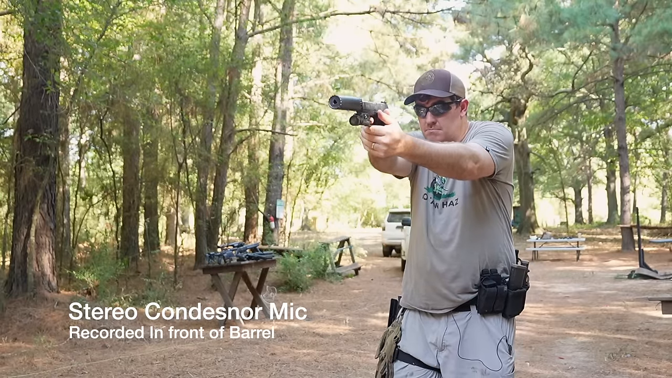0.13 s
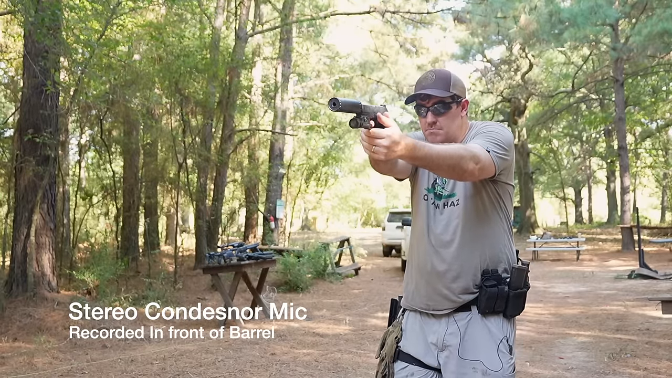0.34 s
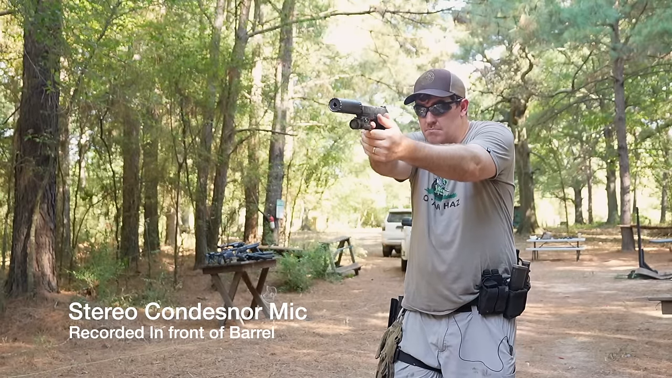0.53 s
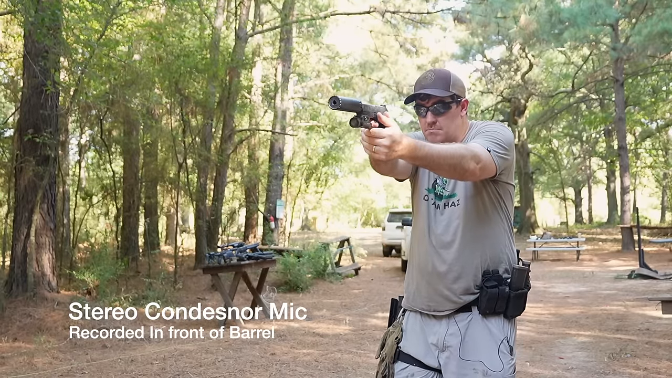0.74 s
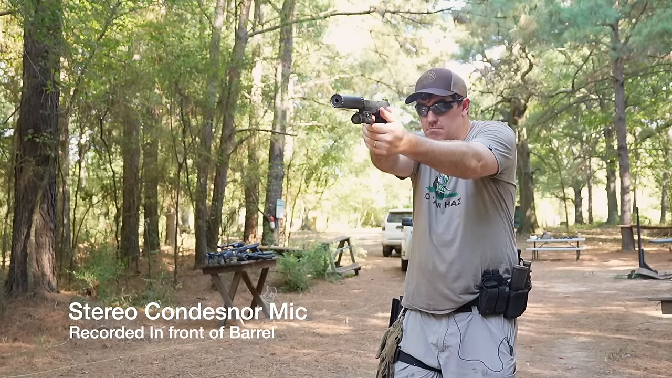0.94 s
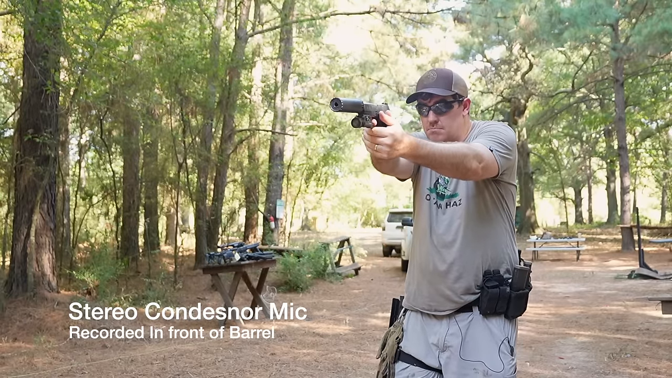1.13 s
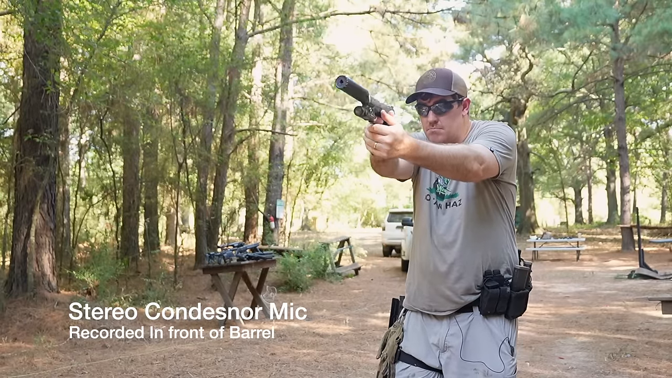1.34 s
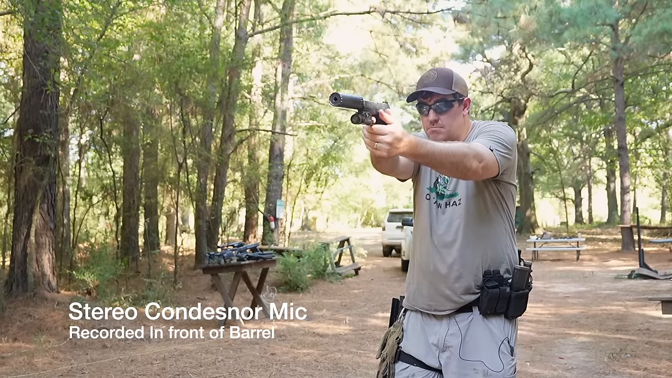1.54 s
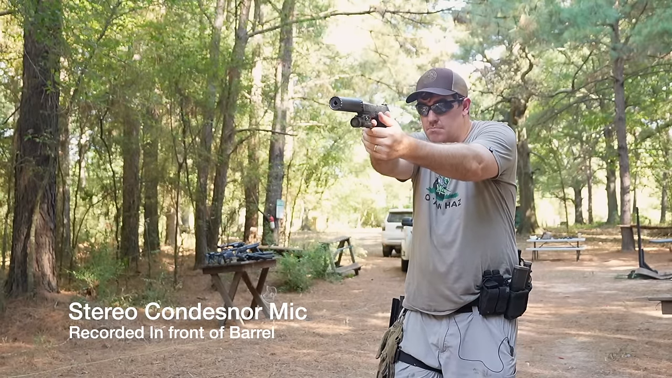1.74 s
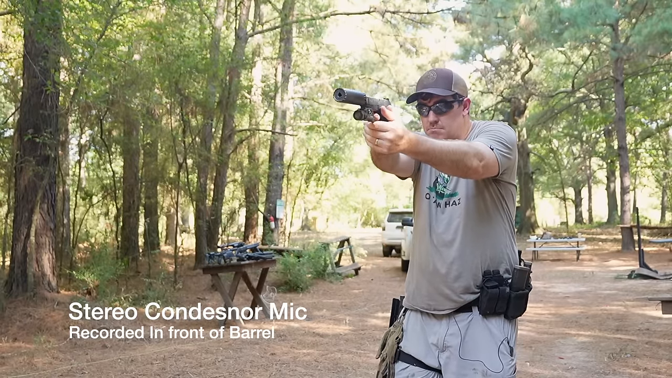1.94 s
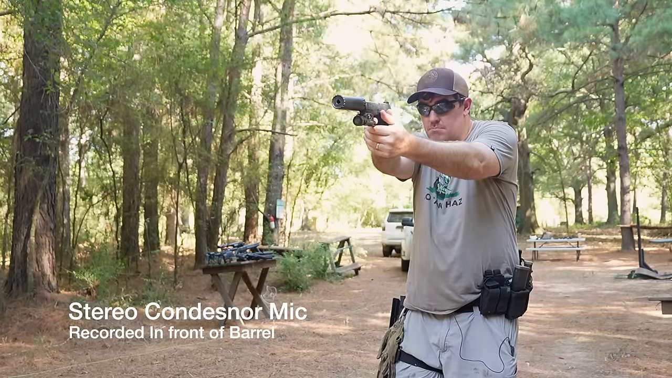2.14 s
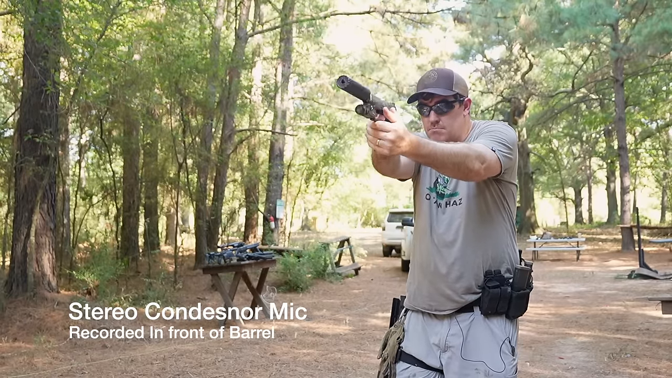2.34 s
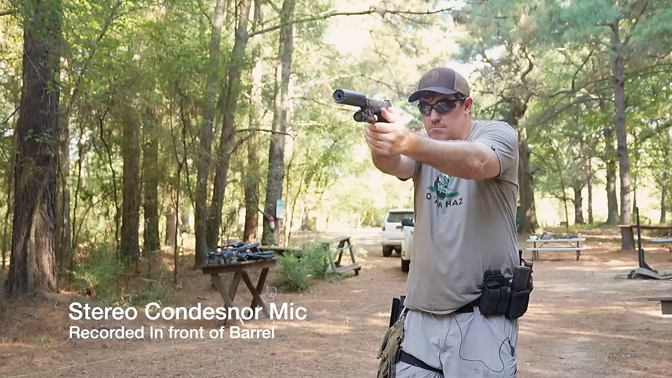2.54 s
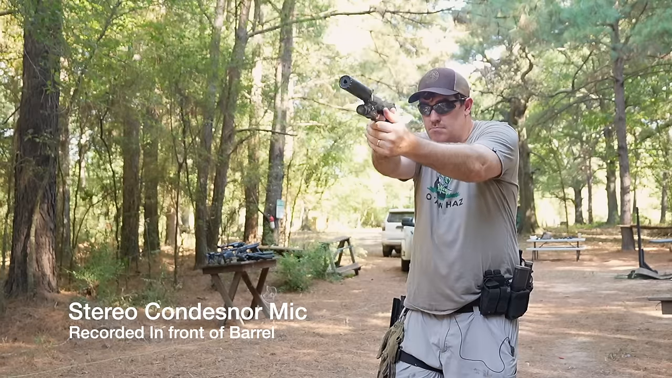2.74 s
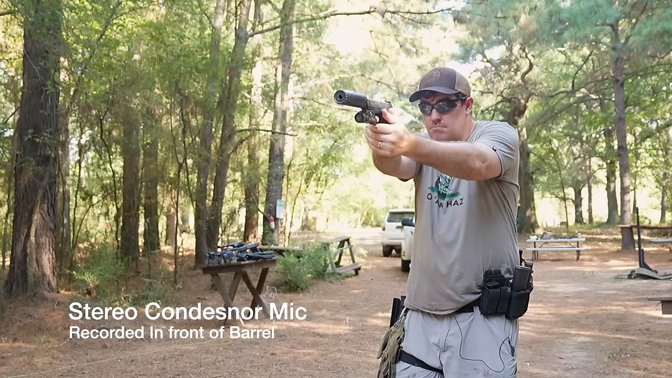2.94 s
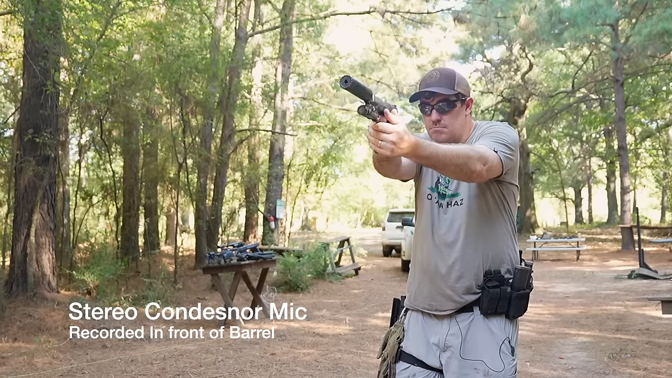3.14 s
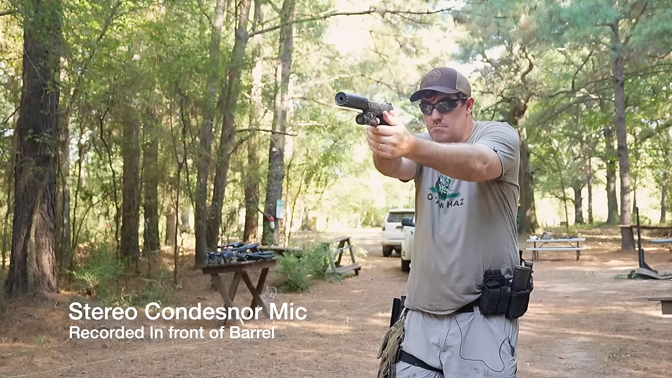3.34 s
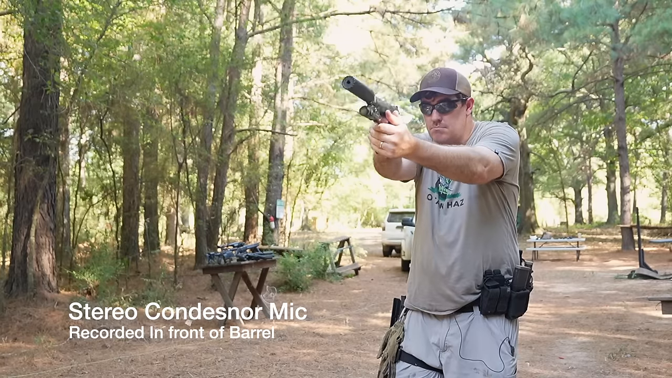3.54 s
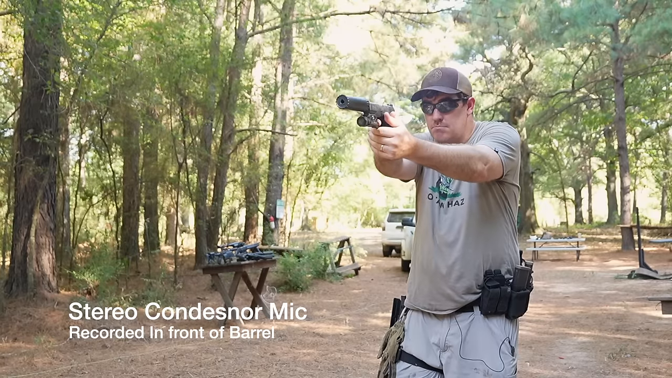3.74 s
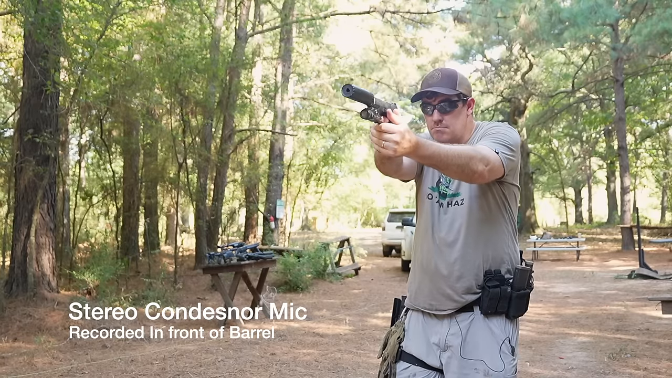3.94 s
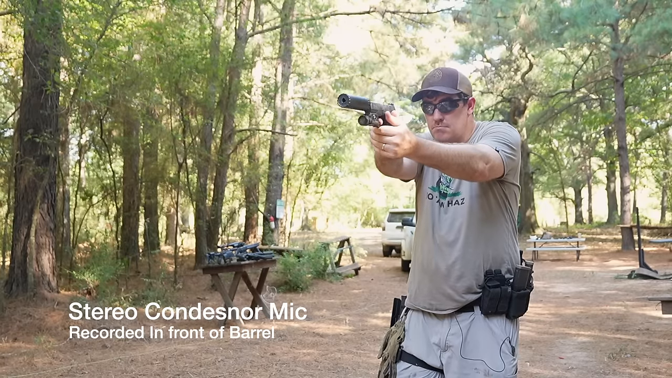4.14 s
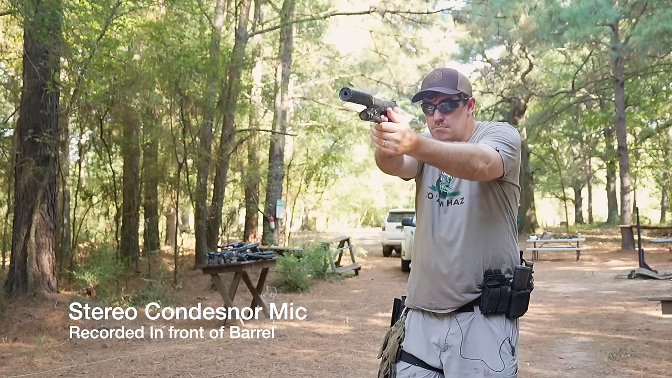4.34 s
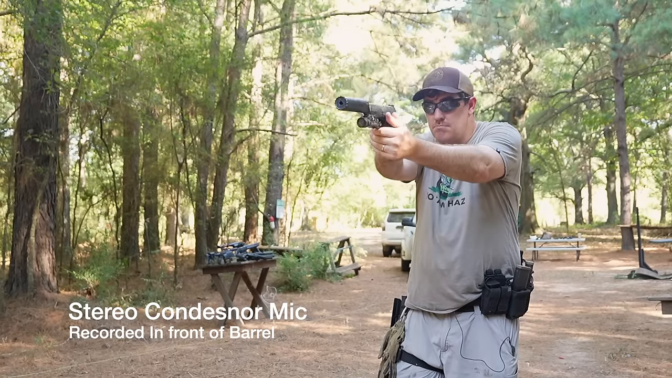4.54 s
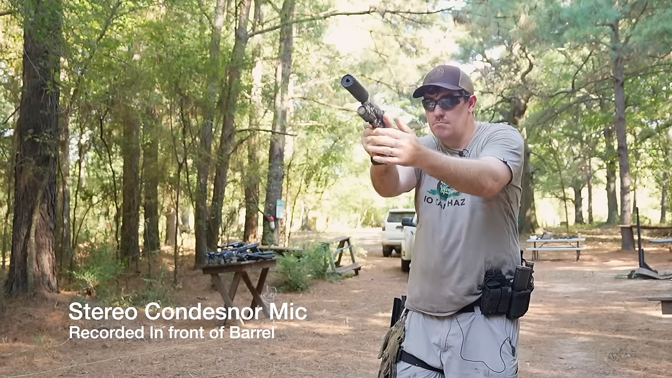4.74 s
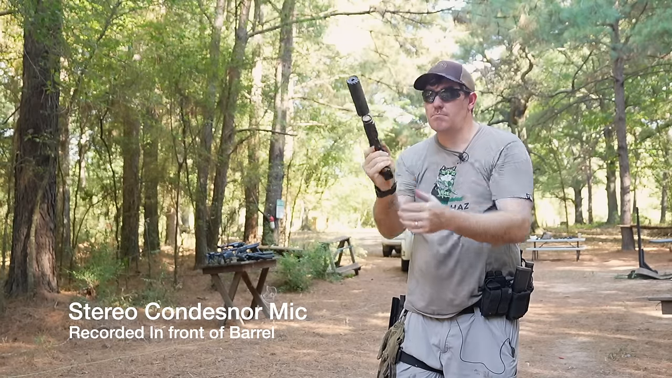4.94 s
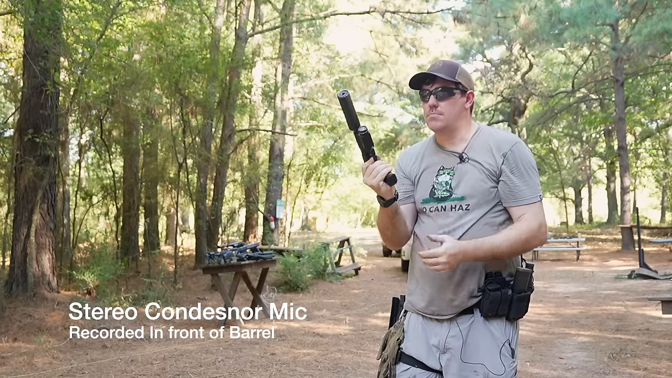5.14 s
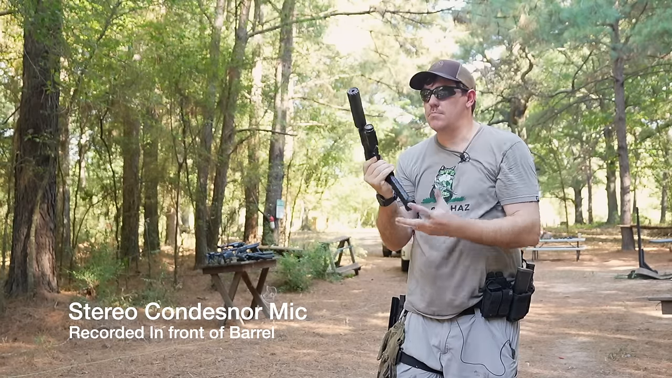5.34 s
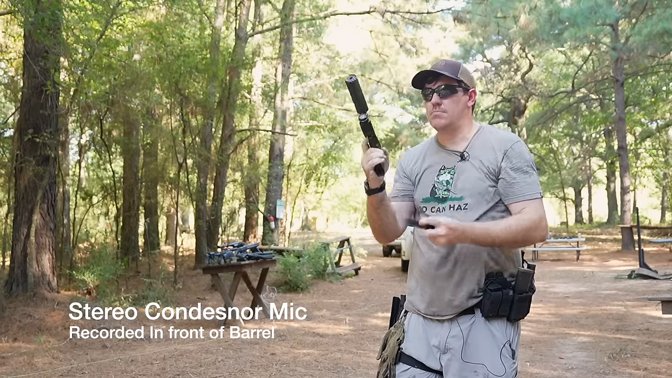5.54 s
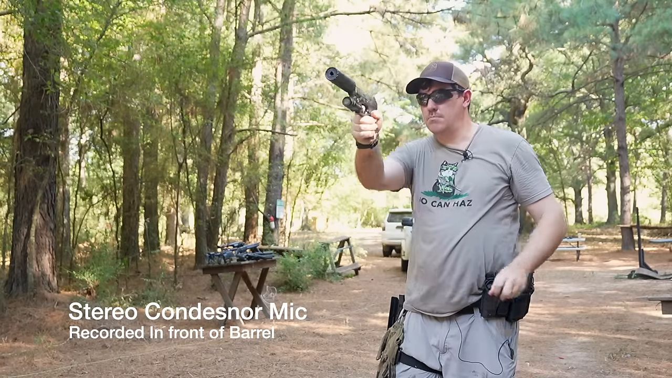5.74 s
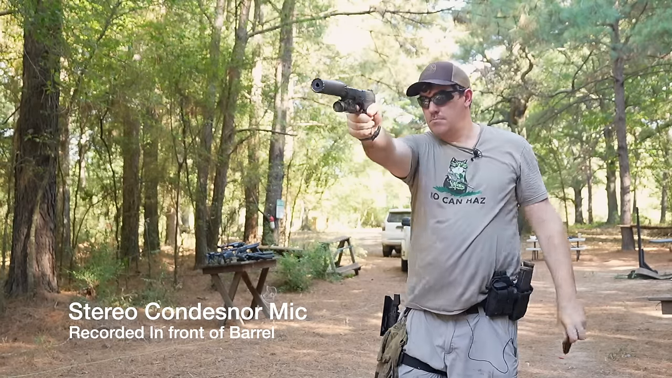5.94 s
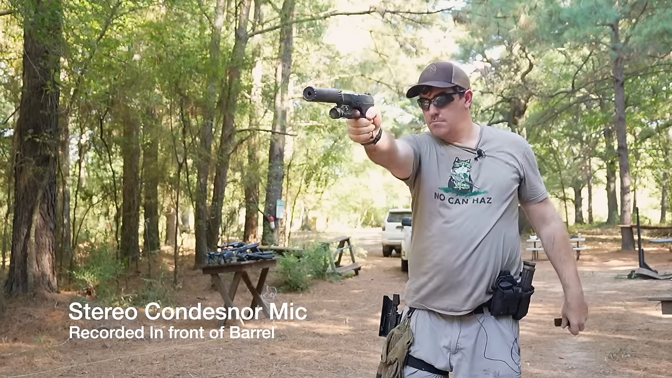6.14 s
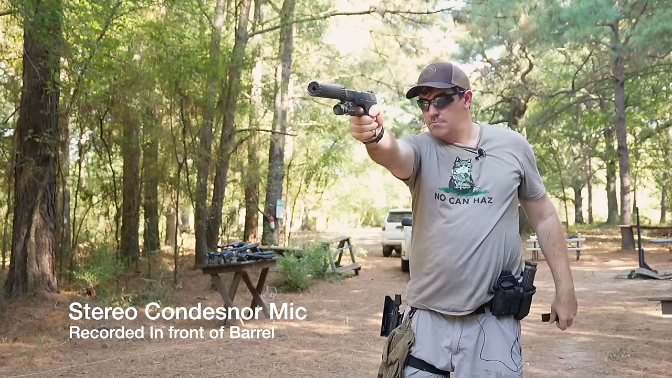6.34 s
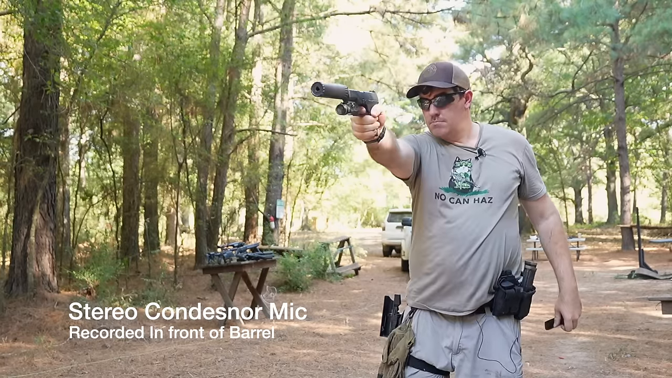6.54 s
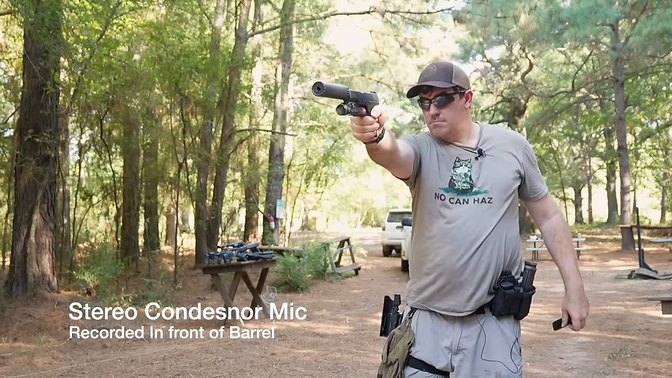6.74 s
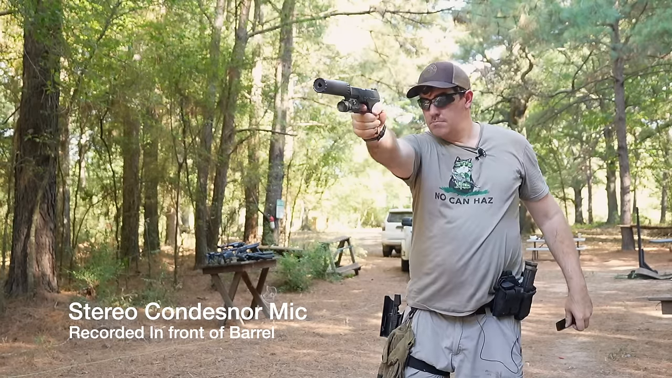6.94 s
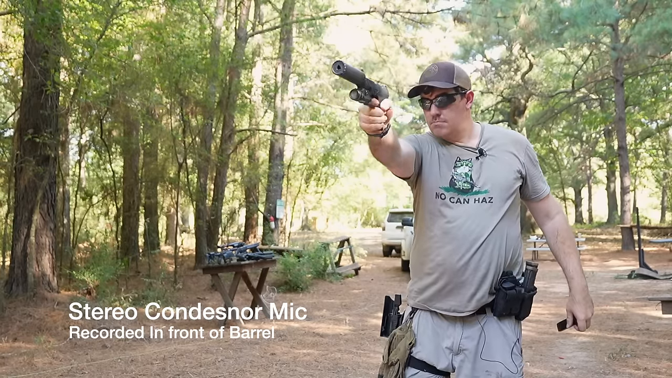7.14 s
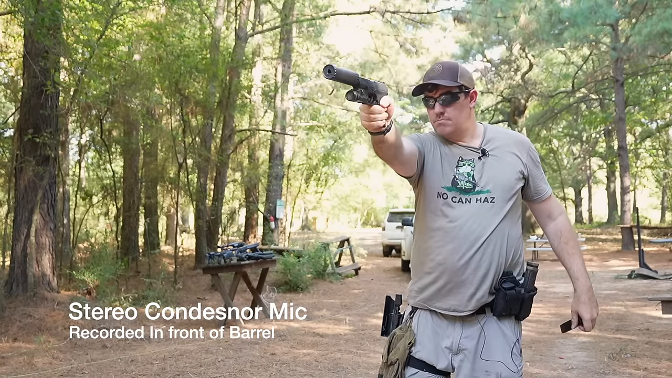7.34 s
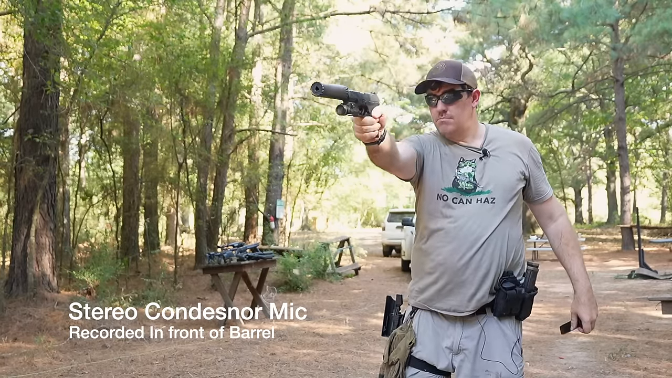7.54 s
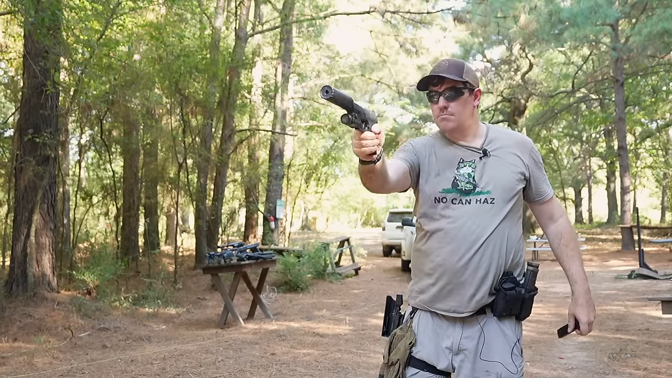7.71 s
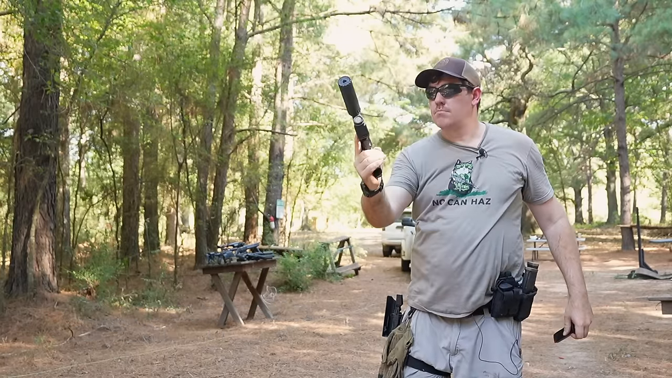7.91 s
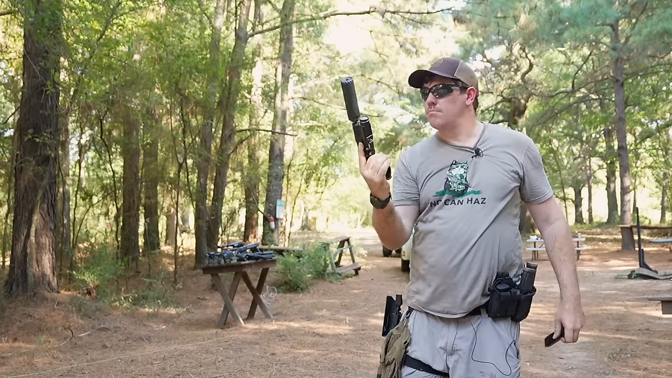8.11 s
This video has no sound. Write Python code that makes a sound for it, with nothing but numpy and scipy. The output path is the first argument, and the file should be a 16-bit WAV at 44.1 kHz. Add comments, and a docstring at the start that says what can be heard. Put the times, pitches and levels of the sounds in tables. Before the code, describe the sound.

A suppressed pistol fires ten quickening shots in the woods, a magazine clicks out, and one last shot follows after a pause.

```python
"""A suppressed pistol fires ten shots in a pine wood, is unloaded, and fires the round left in the chamber.
Each shot layers a hiss of gas from the can, a low puff on the microphone in front of the muzzle and
the steel clack of the slide. Trunks throw back slaps and a grainy tail with a thin whine in it;
spent cases hop on the ground. Behind sit distant shots, one dull thud, a bird, light wind and a low hum."""
import sys
import numpy as np
from scipy import signal
from scipy.fft import rfft, irfft, next_fast_len
from scipy.io import wavfile

SR = 44100
rng = np.random.default_rng(int(sys.argv[2]) if len(sys.argv) > 2 else 0)


def to_wav(s):
    """Save 16-bit WAV."""
    ch = np.atleast_2d(s).T  # columns
    pcm = np.round(np.clip(ch, -1, 1) * 32767)  # PCM
    wavfile.write(sys.argv[1], SR, pcm.astype(np.int16))


N = 360441
TIME = np.arange(N) / SR
AGE = TIME[:SR // 2]   # clock for one short hit

# the pistol's cues, with relative layer levels:
# (time [s], blast [dB], puff [dB], pressure push [signed gain], slide closing [dB], whine [dB])
SHOTS = [(0.024, -1, -12.5, -0.17, 0.5, -41.5), (0.7921, 0.5, -21, -0.12, 3, -33),
         (1.34, 0, -10.5, 0.082, -2, -39.5), (1.8597, -1.5, -16.5, 0.064, .5, -45),
         (2.3222, 0.1, -15, 0.093, 1.5, -38), (2.7253, -1, -4.5, 0.046, -2, -43.5),
         (3.1278, 2, -6.5, 0.025, 0.5, -46), (3.5241, 0, -6, -0.2, 0.5, -43.5),
         (3.9022, -1, -11, -0.15, 4.5, -36.5), (4.2725, -1.2, -8, 0.14, 4.5, -36.5),
         (7.1126, -1, -8, 0.12, -5, -38.5)]
# knocks of the action around ignition: (time from the shot [s], level [dB], t60 [s])
ACTION_KNOCKS = [(-.0098, -27, 0.016), (-.0022, -19.5, 0.04), (0.014, -4.5, 0.026), (0.0191, -8.5, 0.022),
                 (0.032, -15.5, 0.021)]
# tone of the gas, the frame, the slide and small metal parts: (frequency [Hz], level [dB])
BLAST_EQ = [(150, -4.5), (300, -3.5), (500, -6.5), (1300, -10.5), (2500, -3.5), (4000, -4), (5300, 0.5),
            (6100, -1.5), (7200, 4), (10500, 0), (12000, -2.5), (16000, 2)]
FRAME_EQ = [(200, -12), (600, -9), (1200, -12.5), (2400, -1.5), (4000, -5), (8000, -6), (10600, -3.5),
            (12000, -7), (16000, -20.5)]
SLIDE_EQ = [(200, -23), (900, -14.5), (2000, -18.5), (4200, -14), (6000, -10.5), (7700, 0), (9000, -2.5),
            (10900, 6.5), (11600, -12), (13000, -10), (16000, -8.5)]
CLICK_EQ = [(300, -38), (780, -16), (1200, -21.5), (2400, -15), (3300, -16.5), (4000, -6), (5000, -0.5),
            (6300, 3.5), (7600, 3), (9300, -4.5), (11000, 1), (13000, -8.5), (16000, -7)]
# the slide's steel: (frequency [Hz], relative level at the rear stop [dB], on closing [dB], t60 [s])
SLIDE_MODES = [(7470, -25.5, -35.5, .035), (8170, -25.5, -36.5, .035), (9100, -31, -35.5, 0.04),
               (10055, -28, -29, .025), (10680, -34, -17.5, 0.042), (10400, -20, -33, 0.02),
               (15630, -33.5, -36, .04)]
# clicks of the trigger, the magazine and the grip: (time [s], level [dB], t60 [s])
HANDLING_CLICKS = [(0.5104, -40.5, 0.018), (1.172, -35, .013), (4.9677, -45, .029), (4.995, -47, .025),
                   (5.234, -12, 0.016), (5.435, -52.5, 0.032), (5.5422, -51.5, .025), (5.6897, -51, 0.018)]
# small parts ringing on after a click: (time [s], frequency [Hz], level [dB], t60 [s])
PART_PINGS = [(4.9675, 3650, -44, .025), (4.9675, 9740, -53, .18), (5.2338, 790, -41.5, 0.03),
              (5.2342, 5580, -49, 0.13)]
# scatter from the trees: (frequency [Hz], near trunks [dB], deep wood [dB], deep wood t60 [s])
WOOD_BANDS = [(150, -35.5, -31.5, 1.3), (357.2, -40.5, -38, 2.3), (684, -23.5, -36, 3.72),
              (1180, -21.5, -39, 3.8), (2500, -16.5, -28.5, 1.59), (3993, -18, -28, 1.4),
              (5292, -13, -31.5, 1.3), (6200, -14, -29.5, 1.54), (7860, -11, -29, 1.295),
              (10450, -16, -34.5, 1.1), (15500, -27, -43.5, .9)]
# big trunks that slap back every shot: (delay [s], relative level [dB])
BIG_TRUNKS = [(.045, -24), (0.1137, -23), (.1305, -27), (.1505, -42), (.1945, -38), (0.2312, -32)]
# shots elsewhere on the range: (time [s], crack [dB], wash [dB], treble edge [Hz], ring [dB])
FAR_SHOTS = [(.511, -22, -28.5, 2995, -58), (1.17, -26, -30, 1800, -66), (4.998, -38, -41, 6000, -72),
             (5.48, -35, -46, 2280, -79), (7.657, -24.5, -35, 8900, -55.5)]
# their colour through the trees: (frequency [Hz], relative level [dB], t60 [s])
FAR_WOOD_BANDS = [(300, -26, 1.5), (700, -10, 1.9), (1000, -6, 2.1), (1400, -1.5, 2.1), (1800, -3.5, 2.4),
                  (2800, -4.5, 2), (6500, -4.5, .8), (12130, -24.5, .5)]
# narrow rings in their wash, as of a far steel plate: (frequency [Hz], relative level [dB])
FAR_RINGS = [(924, -0.5), (1350, -1.5), (1750, -3), (2080, -6)]
# wind on the microphone: (time [s], half length [s], level [dB])
GUSTS = [(.44, 0.099, -37), (2.07, 0.11, -46), (2.954, 0.13, -49.5), (5.778, 0.029, -50),
         (6.251, 0.17, -50)]
# the bed of still air: (frequency [Hz], level [dB])
AIR_EQ = [(20, -27.5), (50, -48), (130, -46.5), (280, -59), (600, -57.5), (1200, -65), (2200, -71.5),
          (3200, -71), (5000, -76.5), (16000, -77.5)]


def pistol(ground_echo_s=.0204, jitter_s=.0004, slide_travel_s=.0385, fouling_s_per_shot=.00017):
    """Gas, crack and ground bounce over the knocking action; the slide runs later as the gun fouls."""
    out = np.zeros(N)
    for k, (s, blast_db, puff_db, push, closing_db, _) in enumerate(SHOTS):
        add(out, s, gas_blast(blast_db) + puff(puff_db))
        add(out, s, from_db(4) * pressure_push(push))
        add(out, s, snap(db=-.5, hz=1800))   # the shock front that leads the gas
        add(out, s + ground_echo_s, snap(db=-7, hz=2400))
        for after_s, db, t60 in ACTION_KNOCKS:
            add(out, s + after_s + rng.normal(0, jitter_s), knock(FRAME_EQ, db + rng.normal(0, 1), t60))
        slide(out, s + slide_travel_s + k * fouling_s_per_shot, closing_db)
    return out


def gas_blast(db, blowdown_s=.01):
    """The hiss: gas surges from the can at once, then dwindles as its chambers empty."""
    flow = from_db(-3.5) * np.exp(-(AGE / blowdown_s) ** 3)
    surge = from_db(-3.5) * decay(AGE, t60=.024)
    leak = from_db(-24) * decay(AGE, t60=.08)
    return from_db(db) * (flow + surge + leak) * noise(BLAST_EQ, len(AGE))


def puff(db, hz=86, peak_s=.0048, flutter_ratio=2.4):
    """The low punch: the gas cloud rocks the microphone, with a faster flutter and eddies on top."""
    rock = np.sin(2 * np.pi * hz * AGE)
    flutter = from_db(-14) * np.sin(2 * np.pi * flutter_ratio * hz * AGE)
    eddies = from_db(-20) * band_noise(170, 450, len(AGE))
    swell = (AGE / peak_s) ** 2 * np.exp(2 - 2 * AGE / peak_s)
    return from_db(db) * swell * (rock - flutter + eddies)


def pressure_push(push, rise_s=.012):
    """The sub layer: the microphone holds the push briefly, swings past rest and creeps back."""
    age = TIME[:2 * SR]
    hold_s, recover_s = (.088, .3) if push > 0 else (.036, .15)   # suction lets go sooner
    held = np.exp(-np.minimum((age / hold_s) ** 3, 50)) * (1 - np.exp(-age / rise_s))
    back = age * np.exp(-2 * age / recover_s)
    return push * (held - back * held.sum() / back.sum())   # the two lobes cancel


def snap(db, hz):
    """The crack: one N-shaped pressure pulse with its energy centred on hz."""
    phase = 2 * np.pi * hz * AGE[:256] - np.pi
    return -from_db(db) * phase * np.exp((1 - phase ** 2) / 2)


def slide(track, stop_s, closing_db, rebound_s=.0048, return_s=.0143):
    """Mix in the clack: the slide hits its rear stop, rebounds and slams shut."""
    add(track, stop_s, knock(SLIDE_EQ, db=1, t60=.013))
    add(track, stop_s, steel_ring(db=1.5, closing=False))
    add(track, stop_s + rebound_s, knock(SLIDE_EQ, db=-10.5, t60=.011))
    add(track, stop_s + return_s, knock(SLIDE_EQ, db=closing_db - 11, t60=.042))
    add(track, stop_s + return_s, steel_ring(db=closing_db - .5, closing=True))


def steel_ring(db, closing, spread_db=2, detune=.002):
    """The slide's bright modes, struck a little differently each time."""
    age, out = AGE[:SR // 8], 0
    for hz, stop_db, close_db, t60 in SLIDE_MODES:
        strength = from_db(db + (close_db if closing else stop_db) + rng.normal(0, spread_db))
        pitch = hz * (1 + rng.normal(0, detune))
        out = out + strength * np.sin(2 * np.pi * pitch * age) * decay(age, t60)
    return out


def knock(eq, db, t60):
    """A hard contact: a burst of dense, quickly dying vibration."""
    return from_db(db) * noise(eq, 4096) * decay(AGE[:4096], t60)


def wood_tail(send_db=-.42, near_t60=.45, rise_s=.047, grain_db=2, hop=32):
    """Near trunks return a bright, grainy wash; the deep wood rings longer and duller."""
    fired, out = np.zeros(N), np.zeros(N)
    for s, *_ in SHOTS:
        fired[round(s * SR)] = from_db(send_db) ** 2
    coarse = TIME[::hop]   # the envelopes run on a slower clock
    fired = np.add.reduceat(fired, np.arange(0, N, hop))
    build_up = 1 - np.exp(-(coarse / rise_s) ** 2)
    grain_times = TIME[::40]
    grain = from_db(grain_db * np.interp(TIME, grain_times, rng.standard_normal(len(grain_times))))
    n = next_fast_len(N)
    grainy = rfft(rng.standard_normal(N) * grain / np.sqrt(np.mean(grain ** 2)), n)
    bins = np.arange(n // 2 + 1) * SR / n
    for k, (_, near_db, deep_db, deep_t60) in enumerate(WOOD_BANDS):
        near = from_db(near_db) * decay(coarse, near_t60)
        deep = from_db(deep_db) * decay(coarse, deep_t60)
        one_tail = (near ** 2 + deep ** 2) * build_up ** 2
        power = np.abs(signal.fftconvolve(fired, one_tail)[:len(coarse)])
        band = irfft(grainy * band_share(WOOD_BANDS, k, bins), n)[:N]
        out += band * np.interp(TIME, coarse, np.sqrt(power))
    return out


def trunk_slaps(count=44, centre_hz=2900, spread_db=4, small_db=-20):
    """Trunks return each crack at fixed delays: a few big ones clearly, small ones fading with distance."""
    out, lags = np.zeros(N), rng.uniform(.03, .3, count)
    pitches = centre_hz * 2 ** rng.normal(0, .44, count)
    levels = small_db + np.minimum(rng.normal(0, spread_db, count), spread_db)
    for s, *_ in SHOTS:
        for lag, hz, db in zip(lags, pitches, levels):
            add(out, s + lag, snap(db + rng.normal(0, 2.6), hz) * decay(lag, t60=.54))
        for lag, db in BIG_TRUNKS:
            add(out, s + lag, snap(db + 2, centre_hz))
            add(out, s + lag, knock(FRAME_EQ, db + rng.normal(0, 2), t60=.012))   # smears the slap
    return out


def whines(hz=5195, width_hz=560, rise_s=.025):
    """A narrow, rough whine hangs in each echo, as of the bullet flying off."""
    out, age = np.zeros(N), TIME[:SR]
    fade = (1 - np.exp(-age / rise_s)) * decay(age, t60=1)
    for s, *_, db in SHOTS:
        add(out, s, from_db(db) * fade * band_noise(hz - width_hz / 2, hz + width_hz / 2, SR))
    return out


def handling(touch_s=.0035, seat_s=.0037, unloading_s=(5.1, 5.4), ticks=7):
    """Each part touches, snaps home and seats, and a few ping; faint ticks fill out the unloading."""
    out = np.zeros(N)
    for s, db, t60 in HANDLING_CLICKS:
        add(out, s - touch_s, click(db - 18, t60=.027))
        add(out, s, click(db, t60))
        add(out, s + seat_s, click(db - 7, t60))
    for s in np.linspace(*unloading_s, ticks) + rng.normal(0, .02, ticks):
        add(out, s, click(db=rng.normal(-59, 2.4), t60=.024))
    for s, hz, db, t60 in PART_PINGS:
        add(out, s, from_db(db) * np.sin(2 * np.pi * hz * AGE) * decay(AGE, t60))
    return out


def spent_cases(flight_s=.652, hop_s=.04, landings=4, loss_db=.5):
    """Each case lands after its flight and hops on unevenly, a little weaker each time."""
    out = np.zeros(N)
    for s, *_ in SHOTS:
        landing = s + flight_s
        for k in range(landings):
            add(out, landing, click(db=-47 - k * loss_db, t60=.0184))
            landing += hop_s * (.5 + rng.random())
    return out


def click(db, t60):
    """A small metal click with a faint return from the trees."""
    tail = from_db(-40) * decay(AGE, t60=.54)
    return from_db(db) * noise(CLICK_EQ, len(AGE)) * (decay(AGE, t60) + tail)


def far_shots(swell_s=.025, ring_width_hz=50):
    """Distance leaves a short dull crack and a wash that swells, then lingers and rings in the mids."""
    out, age = np.zeros(N), TIME[:2 * SR]
    bins = np.arange(SR + 1) / 2
    swell = 1 - np.exp(-age / swell_s)
    for s, crack_db, wash_db, edge_hz, ring_db in FAR_SHOTS:
        dulled = rfft(rng.standard_normal(len(age))) / np.hypot(1, (bins / edge_hz) ** 2)
        crack = from_db(crack_db) * decay(age, t60=.031)
        for k, (_, db, t60) in enumerate(FAR_WOOD_BANDS):
            band = irfft(dulled * band_share(FAR_WOOD_BANDS, k, bins))
            wash = from_db(wash_db) * swell * decay(age, t60)
            add(out, s, from_db(db) * band * (crack + wash))
        for hz, db in FAR_RINGS:
            ring = band_noise(hz - ring_width_hz / 2, hz + ring_width_hz / 2, len(age))
            add(out, s, from_db(ring_db + db) * ring * swell * decay(age, t60=2.4))
    return out


def thud(time_s=4.702, db=-42):
    """Something hits the ground once, dull and dry."""
    out = np.zeros(N)
    add(out, time_s, from_db(db) * band_noise(350, 1610, len(AGE)) * decay(AGE, t60=.025))
    return out


def bird(start_s=6.599, gap_s=.074, notes=5, first_hz=3020, step_hz=75.3, fall_hz_per_s=12000):
    """A far bird's run of short, rough, falling chirps, each a little lower."""
    chirp_s, warble_hz = .009, 130
    out, from_peak = np.zeros(N), AGE - 2 * chirp_s
    for k in range(notes):
        warble = warble_hz * band_noise(60, 400, len(AGE))
        pitch = first_hz - k * step_hz - fall_hz_per_s * from_peak + warble
        swell = from_db(rng.normal(-68, 2)) * np.exp(-np.minimum((from_peak / chirp_s) ** 2, 20))
        peak_s = start_s + k * gap_s + rng.normal(0, .003)
        add(out, peak_s - 2 * chirp_s, swell * np.sin(2 * np.pi * np.cumsum(pitch) / SR))
    return out


def wind(breeze_db=-74, lowpass_hz=130):
    """A faint breeze and a few gusts rumble on the microphone."""
    strength = from_db(breeze_db)
    for s, half_s, db in GUSTS:
        strength = strength + from_db(db) * np.exp(-np.minimum(((TIME - s) / half_s) ** 4, 20) / 2)
    lowpass = signal.butter(2, lowpass_hz, fs=SR, output="sos")
    return strength * signal.sosfilt(lowpass, band_noise(18, 62))


def air_and_hum(hum_hz=60, hum_db=-63.5):
    """The bed: still air with a low, steady hum."""
    return noise(AIR_EQ, N) + from_db(hum_db) * np.sqrt(2) * np.sin(2 * np.pi * hum_hz * TIME)


def from_db(db):
    """Decibels to gain."""
    return 10 ** (np.asarray(db) / 20)


def at_hz(points, hz):
    """Read a curve on a log-frequency axis."""
    rows = np.array(points)
    return np.interp(np.log(np.maximum(hz, 1)), np.log(rows[:, 0]), rows[:, 1])


def band_share(bands, row, hz):
    """Crossover: how much of each frequency belongs to one row of a table of bands."""
    return at_hz([(band[0], j == row) for j, band in enumerate(bands)], hz)


def noise(eq, size):
    """Noise through an EQ curve; a flat 0 dB gives white noise of rms 1."""
    n = next_fast_len(size)
    gain = from_db(at_hz(eq, np.arange(n // 2 + 1) * SR / n))
    return irfft(rfft(rng.standard_normal(n)) * gain, n)[:size]


def band_noise(low_hz, high_hz, size=N):
    """Noise between two edges, rms 1."""
    bandpass = signal.butter(2, [low_hz, high_hz], "band", fs=SR, output="sos")
    band = signal.sosfilt(bandpass, rng.standard_normal(size))
    return band / band.std()


def decay(age, t60):
    """Silent before age zero, then 60 dB down in t60 seconds."""
    return (age >= 0) * np.exp(-np.minimum(np.log(1000) * np.abs(age) / t60, 50))


def add(track, s, sound):
    """Mix a sound into a track at s seconds."""
    i = max(round(s * SR), 0)
    track[i:i + len(sound)] += sound[:max(N - i, 0)]


def scene():
    """The mono mix, as it reaches one microphone."""
    gunfire = pistol() + wood_tail() + trunk_slaps() + whines() + far_shots()
    foley = handling() + spent_cases() + thud()
    ambience = wind() + air_and_hum() + bird()
    return (gunfire + foley + ambience)[None]


def record(dry, ceiling=.82, cutoff_hz=15900):
    """The blasts overload the input softly; a steep low-pass cuts the top."""
    lowpass = signal.ellip(12, .2, 70, cutoff_hz, fs=SR, output="sos")
    return signal.sosfilt(lowpass, ceiling * np.tanh(dry / ceiling))


dry = scene()
out = record(dry)
to_wav(out)
```